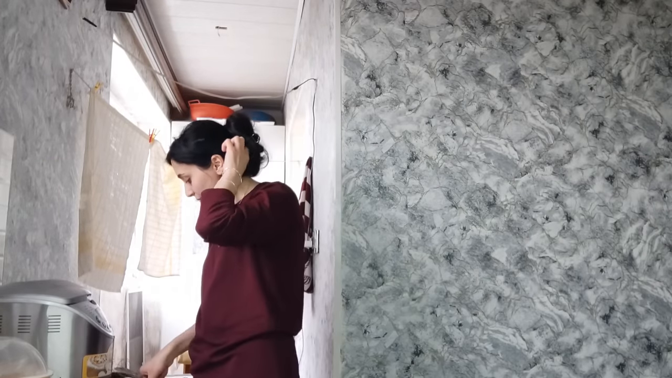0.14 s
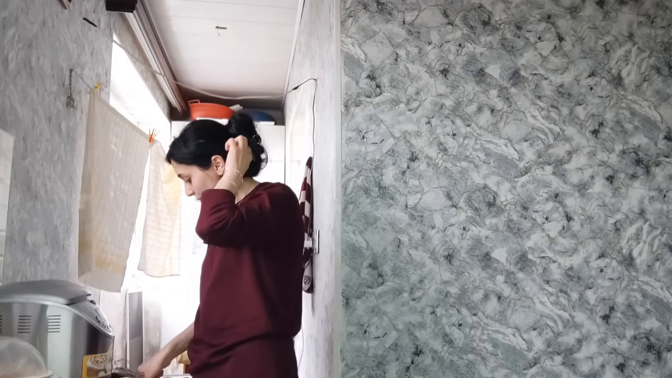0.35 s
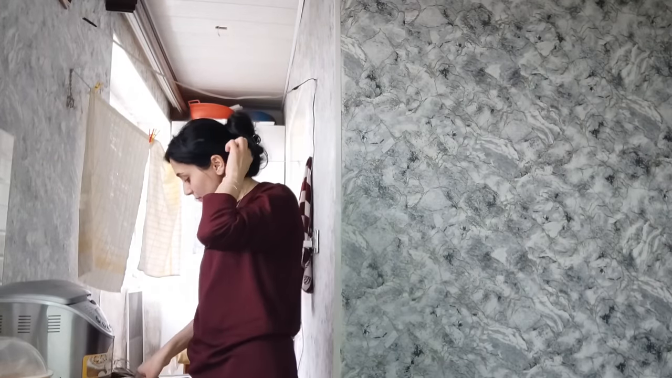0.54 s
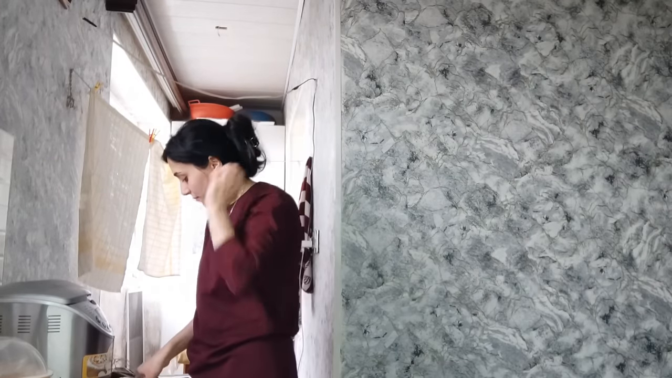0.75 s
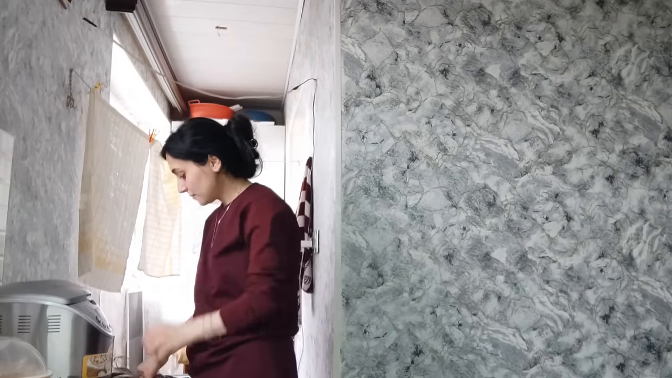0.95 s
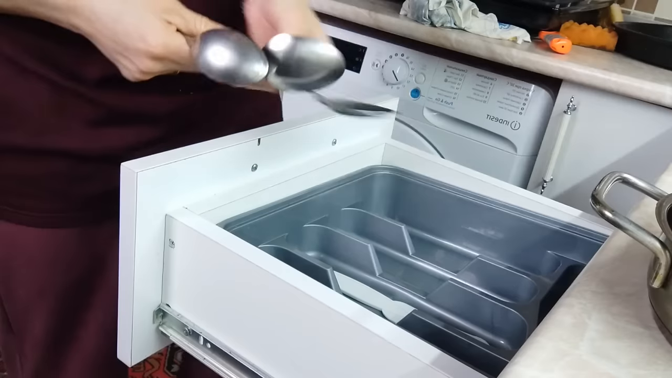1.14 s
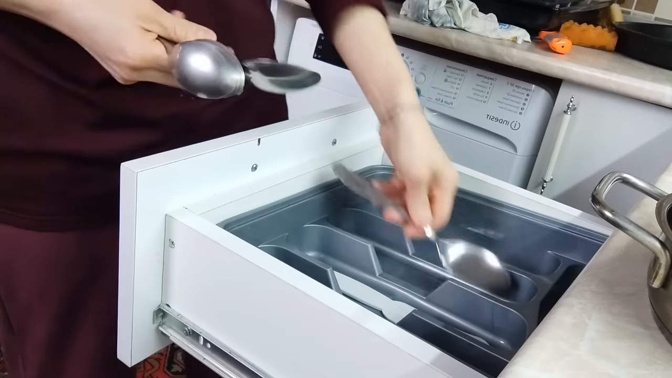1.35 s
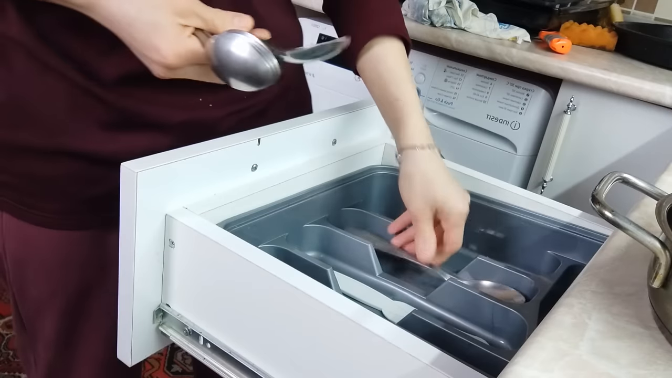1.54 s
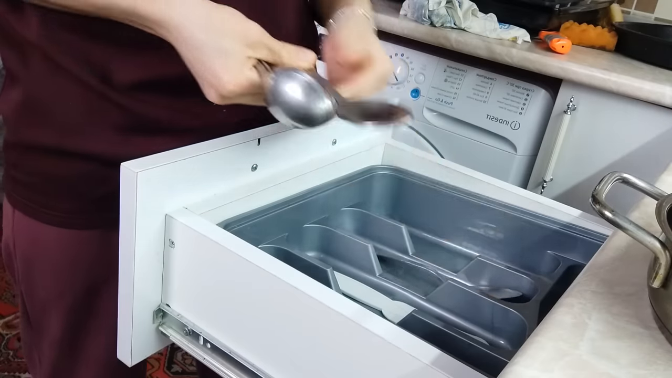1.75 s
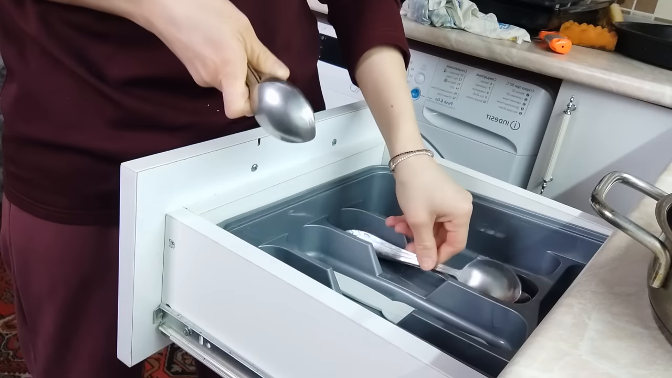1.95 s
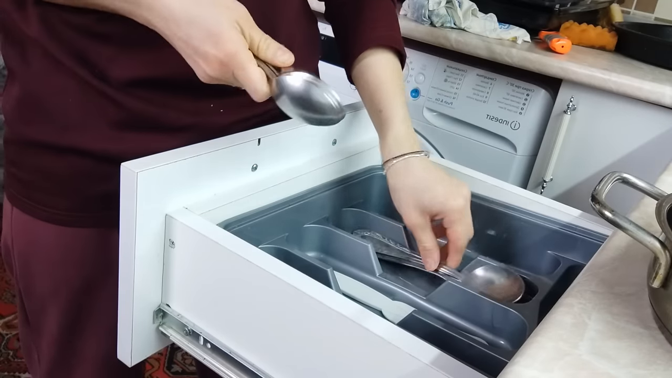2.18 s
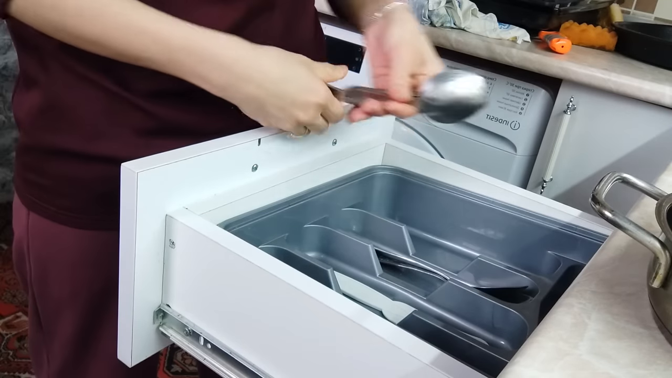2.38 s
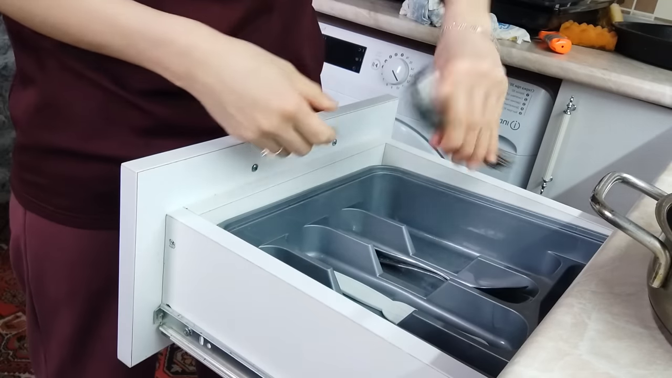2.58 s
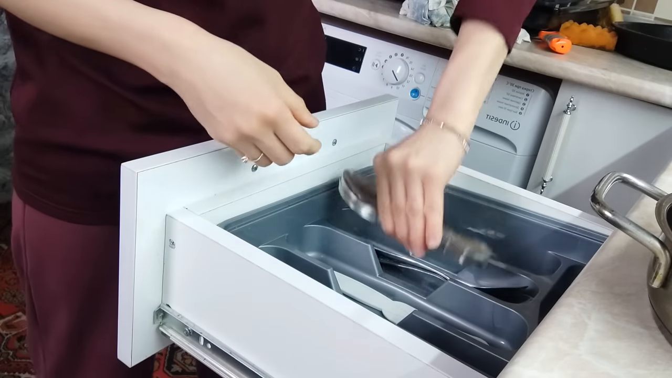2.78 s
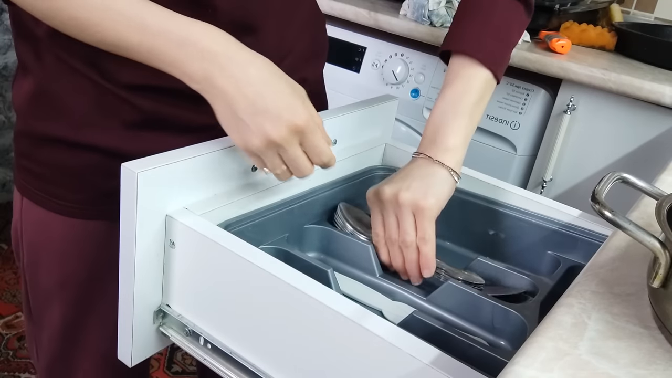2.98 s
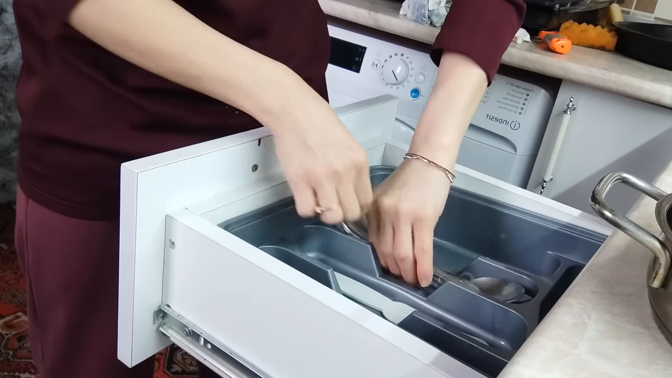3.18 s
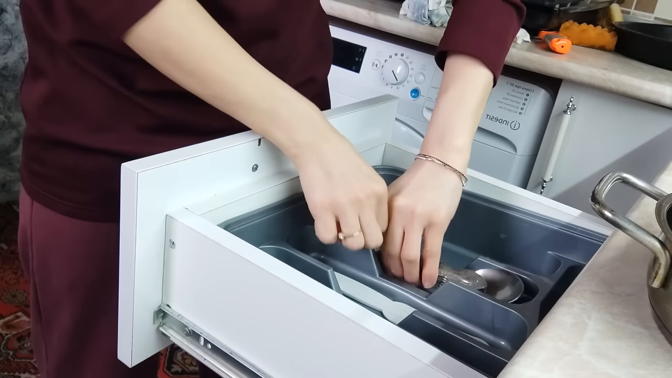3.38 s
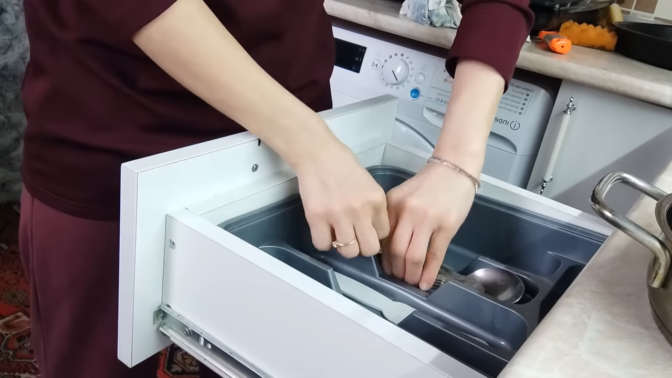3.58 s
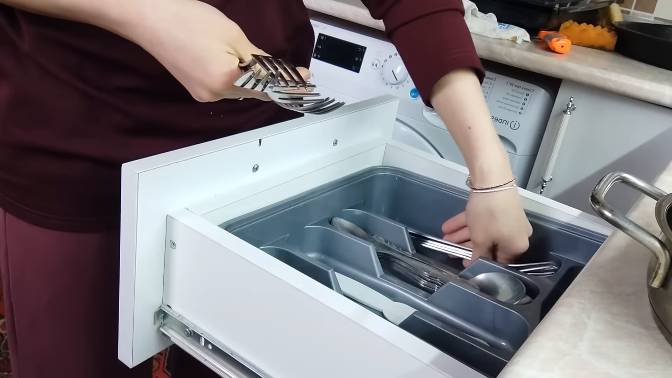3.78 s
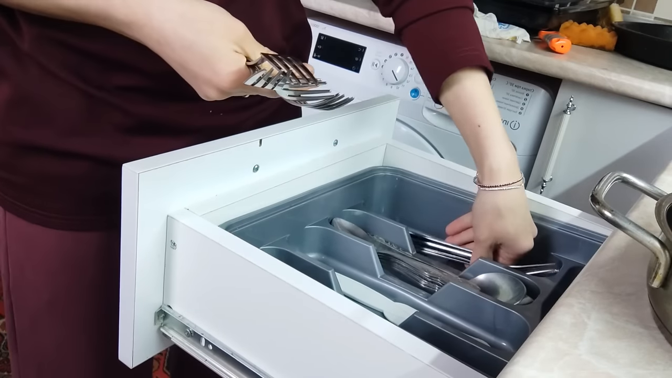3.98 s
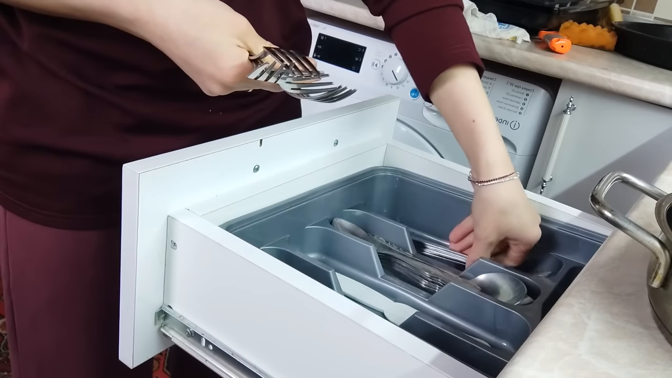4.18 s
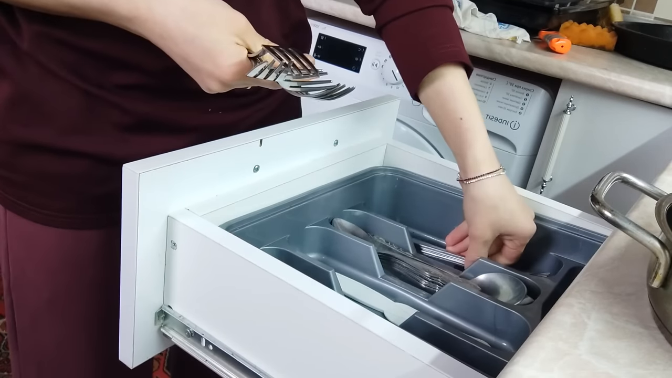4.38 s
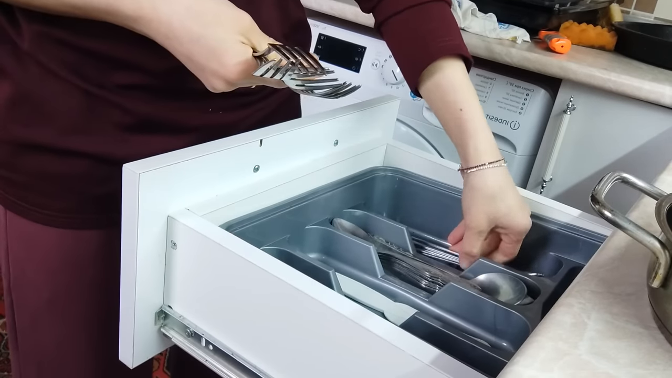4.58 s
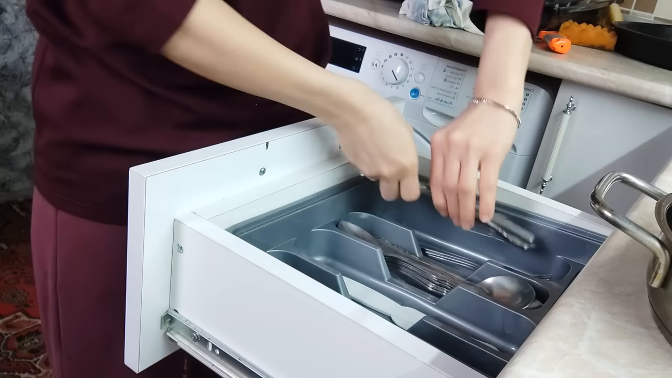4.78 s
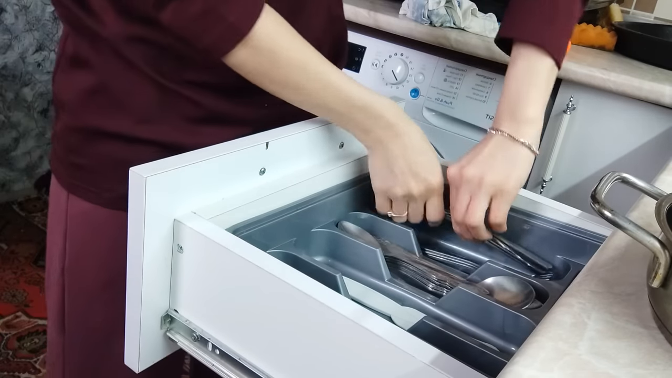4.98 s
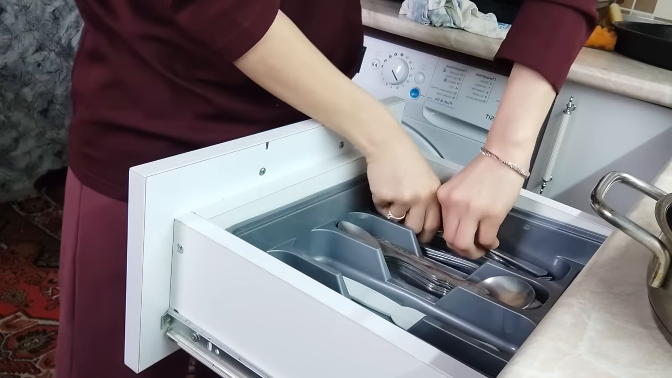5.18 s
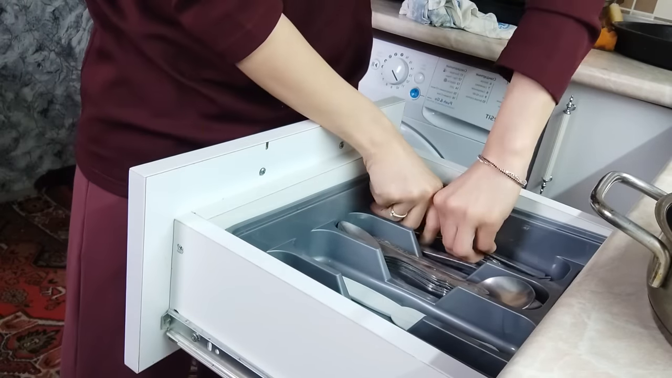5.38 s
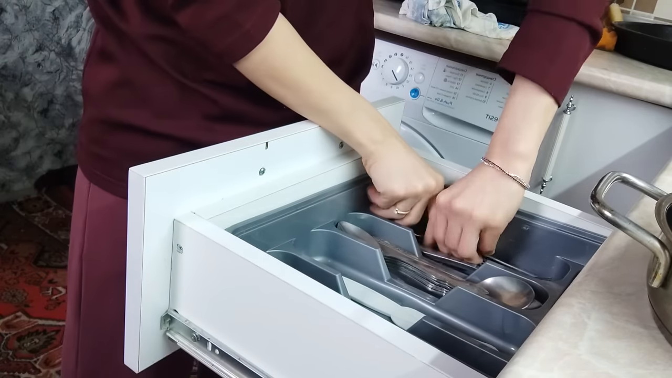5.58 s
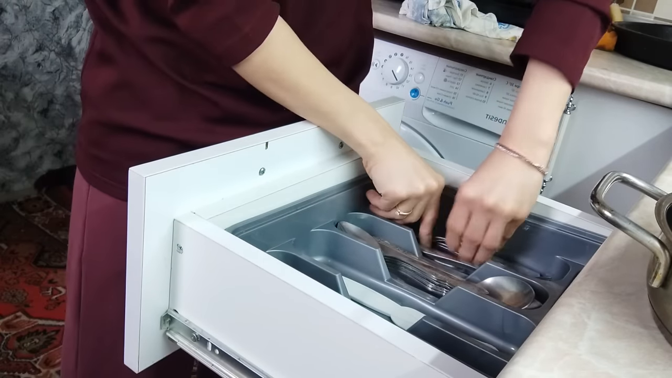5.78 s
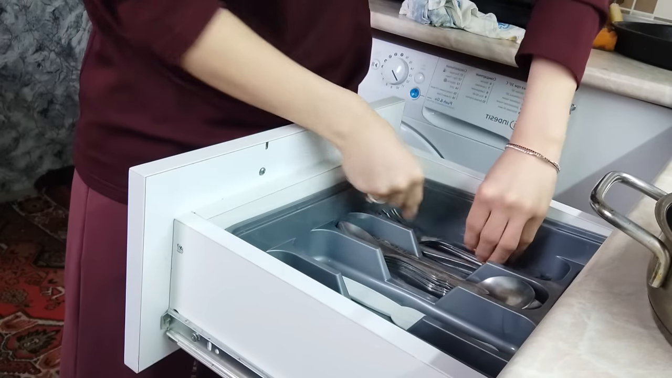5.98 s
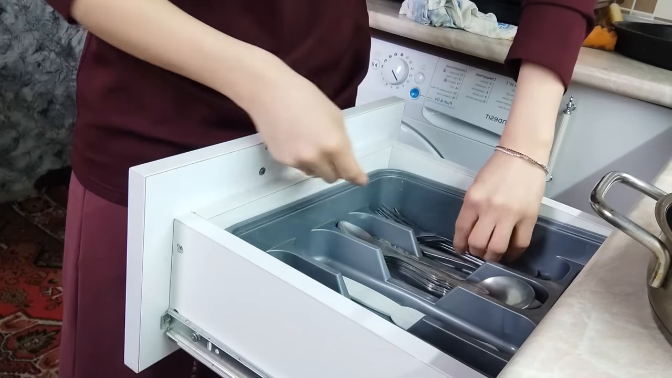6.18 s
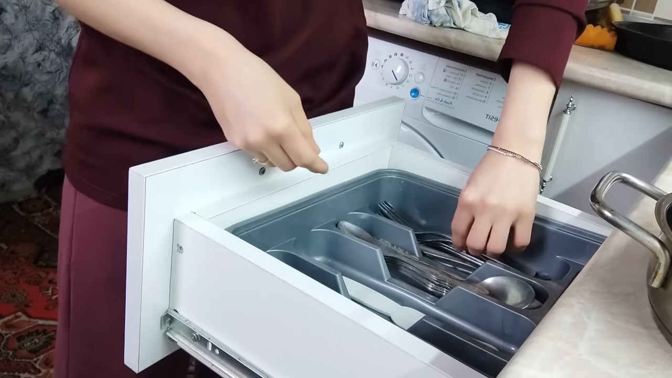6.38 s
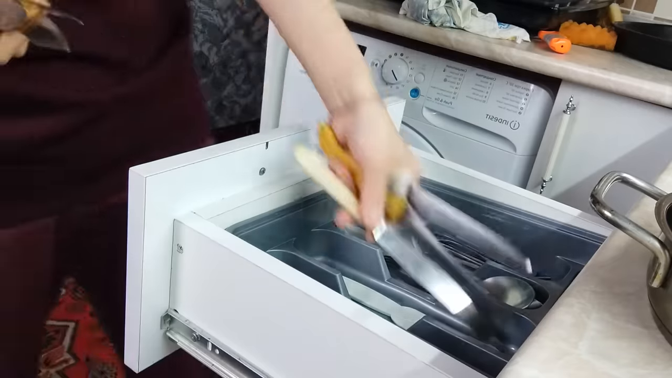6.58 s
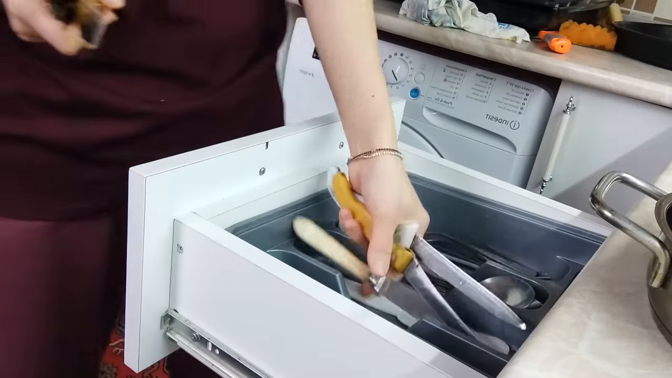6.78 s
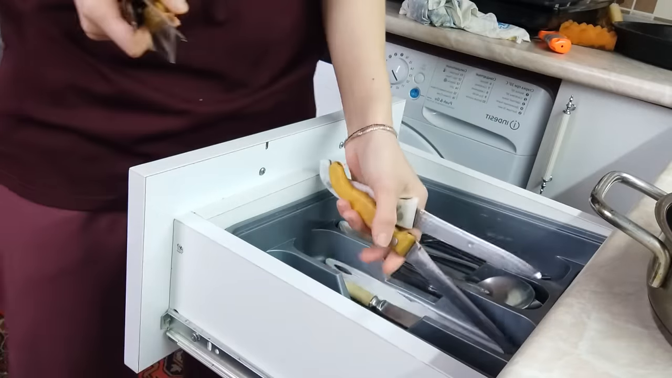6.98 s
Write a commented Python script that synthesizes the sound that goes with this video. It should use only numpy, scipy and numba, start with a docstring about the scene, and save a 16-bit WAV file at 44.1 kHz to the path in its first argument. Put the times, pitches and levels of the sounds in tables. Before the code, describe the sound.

Close, dry sound of cutlery going into a plastic drawer tray in a small kitchen, over faint low hum and hiss. From 0.2 to 0.7 s, thin bright clinks and jingles, then near quiet. At about 1.5 s a spoon lands with a hard, hollow knock; from 1.7 to 2.2 s comes the densest clatter, with clear ringing notes and drawer thumps. A lull, then bright chattering drops at 3.0 and 3.4 to 3.5 s. Forks clink at 3.9 and 4.2 s; around 4.6 to 4.8 s tines scrape raspily. From 5.0 to 6.4 s, knocks, small jingles, short scrapes and a slight squeal at 5.55 s. Blades scrape near 6.7 s, then heavy knife knocks tumble from 6.8 s to the end. Tiny silent dropouts occur near 1.15, 1.8, 2.4, 3.65, 4.7 and 6.5 s.

```python
"""Steel spoons, forks and knives are laid into the plastic tray of a kitchen drawer, heard close up.
Steel chatters on steel and excites clusters of high, quickly damped modes; single notes sing out.
Blows ring the lower modes of tray and drawer; tines and blades scrape as noise through gliding resonances.
Rubbing noise rings the tray over a background hum and hiss; the sound drops out for an instant six times."""
import sys
import numpy as np
from numba import njit
from scipy import signal
from scipy.io import wavfile
from scipy.ndimage import uniform_filter1d

SR = 44100
rng = np.random.default_rng(int(sys.argv[2]) if len(sys.argv) > 2 else 0)


def materialize(psi):
    """Save the field psi as 16-bit PCM at rate SR to the path in sys.argv[1].

    A 1-D psi becomes a single channel; in a 2-D psi each row is a channel.
    """
    bounded = np.clip(np.atleast_2d(psi).T, -1, 1)
    quanta = np.round(bounded * 32767).astype(np.int16)
    wavfile.write(sys.argv[1], SR, quanta)


N = 310464
T = np.arange(N) / SR

# modes of tray and drawer: pitch_hz, relative_db, share of the blow's t60 (used by blows only)
TRAY_MODES = [(70.4, -16, 1.4), (126.4, -3.5, 1.1), (246.4, -7.5, 1.9), (318.5, -0.5, 1.28),
              (357.3, 2.5, 0.64), (402.7, -11.5, 2.6), (486, -2, 0.72), (556, -4, 0.93), (733, -1.5, 0.16),
              (871.7, 3, 0.74), (959, 4.5, 0.27), (1154, -7.5, 0.73), (1290, 3, 0.55), (1585, -0.5, 0.54),
              (1707, 1.5, 0.52), (1914, 2, 0.3), (2350, 1.5, 0.21), (3510, -4, 0.39)]
# short silent gaps: start_s, end_s
GAPS_S = [(1.1452, 1.1676), (1.8125, 1.8345), (2.362, 2.384), (3.638, 3.660), (4.723, 4.7455),
          (6.478, 6.5005)]


def undb(db):
    """Decibels to amplitude ratio: 20 dB is a factor of ten."""
    return 10 ** (np.asarray(db) / 20)


def level(x, db):
    """Root-mean-square scaling: the whole signal is brought to an rms of db."""
    return x * undb(db) / np.sqrt(np.mean(x ** 2))


def loudest_rms(x):
    """Short-time power: the rms of the loudest 10 ms."""
    return np.sqrt(uniform_filter1d(x ** 2, SR // 100).max())


@njit
def band(x, hz, width):
    """Resonant filtering: a state-variable band-pass whose centre moves every sample."""
    y, band_state, low_state = np.empty(len(x)), 0., 0.
    for i in range(len(x)):
        g, k = np.tan(np.pi * hz[i] / SR), width / hz[i]
        v = (band_state + g * (x[i] - low_state)) / (1 + g * (g + k))
        band_state, low_state, y[i] = 2 * v - band_state, low_state + 2 * g * v, k * v
    return y


@njit(fastmath=True)
def modes(x, pole, gain):
    """Modal superposition: exponentially decaying sinusoids, all struck by x."""
    y, re, im = np.zeros(len(x)), np.zeros(len(gain)), np.zeros(len(gain))
    c, s = pole.real.copy(), pole.imag.copy()
    for i in range(len(x)):
        for m in range(len(gain)):
            re[m], im[m] = re[m] * c[m] - im[m] * s[m] + x[i], re[m] * s[m] + im[m] * c[m]
            y[i] += gain[m] * im[m]
    return y


def ring(x, hz, db, t60):
    """Modal resonance: modes of random sign; peaks come near 1, twice the rms of the loudest 10 ms."""
    decay = np.log(1000) / np.clip(t60, .008, 1)
    pole = np.exp((2j * np.pi * hz - decay) / SR)
    gain = undb(db) * np.sign(rng.standard_normal(len(hz)))
    y = modes(x + 1e-18, pole, gain)
    return .5 * y / loudest_rms(y)


def walk(rate, count=N):
    """Slow random modulation: levels held 1 / rate s, then slewed; spread near 1."""
    hold = int(SR / rate)
    held = np.repeat(rng.standard_normal(count // hold + 1), hold)
    return 1.2 * uniform_filter1d(held, hold)[:count]


def contacts(length_s, per_s, first, spread_db, settle_s, settle_db):
    """Repeated impact: a first blow, small contacts thinning over length_s, and trembling of t60 settle_s."""
    swell_s, uneven_db = 0.0026, 3
    grain_db = 7.5  # the trembling is a spray of tiny ticks of uneven size
    stop_power = 1.22  # above 1 the trembling holds at first, then a hand stills it
    t = np.arange(int(.28 * SR)) / SR
    chance = rng.random(len(t))
    size, fine = rng.standard_normal((2, len(t)))

    hits = (chance < per_s / SR) * np.sign(size) * undb(spread_db * abs(size))
    train = hits * np.exp(-(t / max(length_s, .001)) ** 2)

    ticks = fine * undb(grain_db * abs(size))
    strength = undb(settle_db + uneven_db * walk(147.6, count=len(t)))
    settling = np.exp(-np.log(1000) * (t / max(settle_s, .01)) ** stop_power)
    train += strength * ticks * settling

    train *= 1 - np.exp(-t / swell_s)  # the pieces take a moment to start rattling
    train[0] = first
    return train[:int((.045 + settle_s) * SR)]


def add(out, s, sound):
    """Linear superposition: a sound joins the mix at s, dies away softly and ends by the next gap."""
    i = int(s * SR)
    sound = sound * np.minimum(np.arange(len(sound))[::-1] / (.02 * SR), 1)
    end = min([N] + [int(gap_end * SR) for _, gap_end in GAPS_S if gap_end - .004 > s])
    out[i:min(end, i + len(sound))] += sound[:end - i]


def background():
    """Band-filtered noise: steady hum and hiss in half-octave steps; above 2.5 kHz levels waver at random."""
    # background spectrum: pitch_hz, relative_density_db (per Hz)
    spectrum = [(12, -39), (20, 6.5), (68, -8.5), (123, 13.5), (262, -13), (328, -15), (446, 2.5),
                (499, 1.5), (1290, -28.5), (2600, -21), (3070, -16.5), (5530, -27), (7110, -28.5),
                (10800, -20), (16000, -20)]
    waver_db, total_db = 5.4, -47.5
    hz, db = np.transpose(spectrum)
    out = 0
    for f in 25 * 2 ** np.arange(0, 9.4, .5):
        centre = np.full(N, f)
        noise = band(band(rng.standard_normal(N), centre, 0.83 * f), centre, 0.83 * f)
        band_db = np.interp(np.log(f), np.log(hz), db) + (f > 2500) * waver_db * walk(9)
        out = out + undb(band_db) * noise
    return level(out, total_db)


def shuffle():
    """Friction noise: hands and pieces shifting in the tray ring its modes with uneven grit."""
    # rubbing levels, joined by straight lines: time_s, lower_modes_db, upper_modes_db
    rubbing = [(0.0, -51, -53), (0.391, -54.5, -50), (0.88, -58.5, -56.5), (1.508, -59, -58),
               (1.66, -48, -56), (2.08, -40, -44), (2.41, -51.5, -56), (2.86, -59, -54.5),
               (3.31, -52, -53.5), (3.59, -50.5, -54.5), (5.0, -51.5, -53), (5.23, -54, -44.5),
               (5.59, -55, -56), (5.941, -46, -50.5), (6.47, -45, -52.5), (6.76, -54, -47.5),
               (6.92, -44, -35), (7.04, -30.5, -39)]
    grit = rng.standard_normal(N) * undb(3.26 * walk(70))
    s, *levels_db = np.transpose(rubbing)
    out = 0
    for part, part_db in zip([TRAY_MODES[2:9], TRAY_MODES[9:17]], levels_db):
        hz, db, _ = np.transpose(part)
        rubbed = level(ring(grit, hz, db, 14 / hz), 0)  # higher modes die sooner
        out = out + rubbed * undb(np.interp(T, s, part_db))
    return out


def steel():
    """Modal impact: each clink shakes several like pieces, each mode a cluster new in pitch and strength."""
    # steel on steel: start_s, peak_db of the top rings, low_db and mid_db against it,
    # rattle_s (scales chatter, settling and ringing)
    clinks = [(0.172, -23, -10.5, -4, 0.061), (0.179, -19.5, -6.5, -10, 0.22), (0.298, -27.5, -5, -7, 0.11),
              (0.3074, -19.5, -7.5, -7.5, 0.47), (.341, -31.5, 0.5, -16, 0.27), (0.573, -31, -2, -6, 0.33),
              (0.651, -30, -8.5, -14, 0.2), (0.966, -42.5, -1.5, -5, 0.28), (1.164, -28, -2, -14, 0.052),
              (1.2815, -37, -1, -8, 0.079), (1.47, -18.5, -2.5, -2.5, 0.13), (1.522, -46.5, 8.5, 1, 0.4),
              (1.6703, -27, 1, -5, 0.059), (1.708, -24.5, 3.5, -7, 0.1), (1.792, -30.5, 6, -7, 0.019),
              (1.81, -32, 8, 1, 0.046), (1.844, -42, 0, -3, 0.41), (1.865, -18, -3.5, -1.5, 0.23),
              (1.901, -28, -1.5, -7, 0.16), (1.925, -28.5, 1.5, -6, 0.21), (2.036, -38, 5, -8, 0.58),
              (2.1223, -14, -9, -11.5, 0.24), (2.155, -22.5, -3.5, -0.5, 0.16),
              (2.174, -19, -3.5, -5.5, 0.11), (2.21, -33.5, 6, -3, 0.34), (2.327, -29.5, -2, -12, 0.099),
              (2.345, -39, 6.5, -10, 0.098), (2.489, -39, 0, -5, 0.12), (2.539, -35, -1, -5, 0.1),
              (2.979, -20, -4.5, -8, 0.13), (3.024, -18, -9.5, -7, 0.17), (3.045, -28, 1.5, -2, 0.17),
              (3.172, -31.5, -2.5, -9, 0.27), (3.213, -27.5, -1.5, -3.5, 0.16),
              (3.397, -17.5, -9, -7.5, 0.34), (3.427, -17.5, -3.5, -6.5, 0.16), (3.465, -31, -4, -11, 0.3),
              (3.5, -23.5, -4, -1, 0.15), (3.514, -24.5, -4.5, -9.5, 0.17),
              (3.8731, -18, -12.5, -17, 0.087), (3.987, -28, -8.5, -9, 0.088),
              (4.1934, -23.5, -4.5, -13, 0.24), (4.233, -21, -20, -10.5, 0.16), (4.634, -41, 3, -5, 0.25),
              (4.829, -25, -16, -9.5, 0.079), (4.986, -41, 9.5, 3, 0.05), (5.14, -36.5, 9, -3, 0.38),
              (5.39, -27.5, -7, -8, 0.11), (5.508, -40, -3, -2, 0.63), (5.683, -21, -10, -10, 0.14),
              (5.756, -43, 0, -6, 0.099), (5.829, -38.5, -5, -7, 0.047), (5.857, -49, 1, -1, 0.079),
              (5.931, -32, -14, -8, 0.22), (5.959, -21.5, -13.5, -9.5, 0.23), (6.012, -34, 1.5, -18, 0.12),
              (6.05, -37.5, -7, -2.5, 0.33), (6.157, -35.5, -2, -1.5, 0.17), (6.213, -43, -12, -3, 0.095),
              (6.368, -22.5, -11.5, -7, 0.18), (6.501, -34.5, -3, -7, 0.17), (6.735, -44.5, 11, 2, 0.4),
              (6.7603, -36, 12, -4, 0.18), (6.838, -28, -1.5, -9, 0.17), (6.878, -32.5, 5.5, -9, 0.14),
              (6.926, -28.5, 6, -9, 0.088), (6.972, -33.5, 4, -2, 0.22), (7.002, -29.5, 3.5, -3, 0.2)]
    # a typical piece of cutlery: pitch_hz, relative_db
    piece = [(2100, -33), (2700, -27), (3074, -20), (3550, -17), (4030, -18.5), (4384, -34), (4850, -18.5),
             (5320, -20), (5800, -32), (6400, -16.5), (6900, -23.5), (7670, -2), (8140, 10), (8600, 1),
             (8950, -31), (9300, 6.5), (9850, -0.5), (10400, 6), (11350, 0.5), (11500, -11), (11800, -0.5),
             (12150, -10), (12600, -4.5), (13100, 0), (13600, 5.5), (14300, 4.5), (14650, -24),
             (15050, 5.5), (15690, -21)]
    held_t60_s = 0.049  # fingers and neighbours damp every ring: no mode lasts longer
    chatter_share = 0.13  # spread of the chatter against rattle_s
    tick_low_hz, tick_top_hz = 1460, 7850  # the dry click of each contact
    tick_db = -11  # loudest 10 ms rms of the click, against the lower rings' peak
    tick_band = signal.butter(2, [tick_low_hz, tick_top_hz], "band", fs=SR, output="sos")

    out, (hz, db) = np.zeros(N), np.repeat(piece, 5, axis=0).T
    group = np.searchsorted([7000, 11000], hz)
    low = group == 0
    for s, peak_db, low_db, mid_db, rattle_s in clinks:
        shift, strength, life = rng.standard_normal((3, len(hz)))
        f = hz * (1 + np.where(low, .05, .022) * shift)
        g = db + np.where(low, 5, 8) * np.minimum(strength, 1.2)
        free_t60 = np.where(low, .16, .33) * rattle_s * undb(3.0 * np.clip(life, -2, 1))
        t60 = np.minimum(free_t60, held_t60_s)

        touch = contacts(chatter_share * rattle_s, 700, 5.14, 5.04, 1.16 * rattle_s, -18.5)
        tick = signal.sosfilt(tick_band, touch)
        add(out, s, tick / loudest_rms(tick) * undb(peak_db + low_db + tick_db))
        for k, part_db in enumerate([low_db, mid_db, 0]):
            m = group == k
            add(out, s, ring(touch, f[m], g[m], t60[m]) * undb(peak_db + part_db))
    return out


def pings():
    """Beating of close modes: a blow and a few after-touches ring a pair as one clear note."""
    # notes that sing out of a clink: start_s, pitch_hz, peak_db
    notes = [(.172, 5109, -30), (.172, 14163, -21), (.308, 14707, -27), (.345, 3553, -28),
             (.345, 4382, -33), (.345, 15036, -23), (1.472, 1567, -27), (1.868, 5782, -21),
             (1.869, 3074, -26), (1.927, 3898, -15.5), (1.926, 4727, -20), (1.95, 3122, -25.5),
             (2.123, 3068, -19.5), (2.125, 11456, -17), (2.126, 13706, -27), (2.165, 9841, -18),
             (2.98, 4075, -25), (3.029, 11719, -31), (3.05, 14653, -20), (3.176, 1567, -34),
             (3.24, 6277, -37), (3.401, 8129, -29), (3.43, 1976, -19.5), (3.464, 3117, -25),
             (3.502, 15687, -21), (3.505, 12339, -28), (3.876, 1480, -27), (4.232, 14083, -25),
             (6.37, 13421, -24), (7.005, 5179, -25)]
    ping_t60_s, pair_spread = 0.054, 0.0046  # spread: typical detuning of the second mode, share of pitch
    out = np.zeros(N)
    for s, hz, db in notes:
        touch = contacts(0.022, 300, 4.6, 2.6, ping_t60_s, -19)
        pair = hz * (1 + pair_spread * np.array([0, rng.standard_normal()]))
        add(out, s, ring(touch, pair, np.array([0, -5]), ping_t60_s) * undb(db))
    return out


def tray():
    """Contact-time filtering: blows ring the tray and drawer, longer pushes weakening the higher modes."""
    # steel on the tray: start_s, peak_db of the lower modes, mid_db and high_db against it, blow_t60_s
    knocks = [(.174, -41, 2, 3.5, 0.12), (.298, -34.5, -1, -1, 0.083), (.308, -33.5, -8, 2, 0.14),
              (.35, -39, -5, -3, 0.21), (.578, -48.5, -4, 8, 0.24), (0.653, -41, -2, -6, 0.12),
              (1.172, -39.5, -2, -6, 0.037), (1.476, -6.5, -9, -9, 0.036), (1.518, -23, -1, 0, 0.085),
              (1.544, -25.5, -20, -17, 0.097), (1.599, -30.5, -6, 4, 0.022), (1.709, -7.5, -9, -7.5, 0.046),
              (1.74, -21, 0.5, -6, 0.054), (1.792, -10, -6, -3.5, 0.019), (1.81, -17.5, 0, -9, 0.037),
              (1.865, -31.5, -1, -5, 0.25), (1.925, -5.5, -14, 0.5, 0.027),
              (1.932, -14.5, -0.5, -2.5, 0.066), (2.123, -16, -9, -2, 0.058),
              (2.155, -18.5, -0.5, -0.5, 0.14), (2.19, -24.5, 1, 6, 0.031), (2.385, -49.5, 5.5, 1, 0.17),
              (2.98, -12.5, -11, -10, 0.068), (3.028, -24.5, 2, 1.5, 0.095), (3.15, -34, -7, 4, 0.081),
              (3.21, -30, 3.5, 2.5, 0.11), (3.382, -14, -23, -18, 0.014), (3.417, -28.5, 2.5, 4.5, 0.2),
              (3.519, -20, -9.5, -5.5, 0.056), (3.872, -27.5, 0.5, 6.5, 0.043), (3.958, -41, 0, 2, 0.15),
              (3.986, -37.5, -3, 14, 0.052), (4.194, -20, 3, -1.5, 0.086), (4.229, -32, 4, 2.5, 0.11),
              (4.747, -43, 0, 3, 0.014), (4.987, -19, 6.5, 6.5, 0.03), (4.994, -27, 2, 7, 0.027),
              (5.093, -24, -30, -27, 0.025), (5.17, -23.5, -25, -27, 0.15),
              (5.1961, -17.5, -2, -28.5, 0.059), (5.242, -24.5, -4, -9.5, 0.025),
              (5.331, -29, -2.5, -8, 0.24), (5.383, -22.5, -3, -10, 0.075), (5.427, -36.5, 9, 9, 0.027),
              (5.571, -26, -9, -30, 0.12), (5.682, -18, 6.5, -2.5, 0.053), (5.754, -20.5, -4.5, -12, 0.025),
              (5.8, -49, -6, -16, .06), (5.829, -37, 12, -11, 0.017), (5.855, -28, -3, -13, 0.023),
              (5.933, -39, 13, -26, 0.029), (5.958, -33, 9.5, -0.5, 0.11), (6.013, -16, -9, -11.5, 0.031),
              (6.158, -25.5, -1.5, -5.5, 0.063), (6.212, -30.5, -2.5, -16, 0.062),
              (6.373, -21, -7, -12, 0.073), (6.427, -35.5, 5, 3.5, 0.069), (6.764, -14, -2, -11, 0.053),
              (6.777, -21, -9, -14, 0.067), (6.8, -21.5, -21, -23, 0.067), (6.821, -3.5, -9.5, -16, 0.023),
              (6.826, -13.5, -3.5, -9, 0.021), (6.84, -34, -11, 8, 0.041), (6.868, -17.5, -6.5, -6, 0.043),
              (6.88, -14, -15, -12, 0.044), (6.924, -18, 0.5, -2, 0.058), (6.948, -19, -33, -15, 0.064),
              (7.004, -19, -7, -3.5, 0.047)]
    # heavy landings that shake the whole drawer: start_s, peak_db
    thuds = [(0.577, -29), (0.656, -35), (1.516, -23), (1.544, -16.5), (1.789, -23), (1.927, -29.5),
             (2.157, -24), (2.186, -24.5), (3.029, -34), (3.149, -38), (3.382, -30), (4.196, -27.5),
             (4.23, -44), (4.987, -21), (6.16, -32.5), (6.373, -28.5), (6.43, -34), (6.841, -29),
             (6.873, -28), (6.949, -22.5), (7.004, -22)]
    # contact times: push_s for the drawer, lower, middle and upper modes
    push_s = [0.0047, 0.0011, 0.00064, 0.00022]
    tumble_s, thud_t60_s = 0.0085, 0.094  # each mode rings for its share of the blow's t60
    tray_low_hz = 189  # the tray's blows carry no deep boom
    thin = signal.butter(2, tray_low_hz, "high", fs=SR, output="sos")

    out, (hz, db, share) = np.zeros(N), np.repeat(TRAY_MODES, 5, axis=0).T
    group = np.searchsorted([150, 500, 1200], hz)  # 0 is the drawer
    blows = []
    for s, peak_db, mid_db, high_db, t60 in knocks:
        blows.append((s, t60, {1: peak_db, 2: peak_db + mid_db, 3: peak_db + high_db}))
    for s, peak_db in thuds:
        blows.append((s, thud_t60_s, {0: peak_db}))

    for s, t60, parts in blows:
        shift, strength = rng.standard_normal((2, len(hz)))
        f = hz * (1 + np.where(group > 1, .08, .022) * shift)
        g = db + 3.05 * strength
        touch = contacts(tumble_s, 600, 2.44, 4.0, 1.59 * t60, -28.5)
        for k, part_db in parts.items():
            m = group == k
            # the thin floor yields, so the low modes feel a longer push
            push = np.convolve(touch, np.hanning(int(SR * push_s[k]) + 3))[:len(touch)]
            sound = ring(push, f[m], g[m], t60 * share[m])
            if k:
                sound = signal.sosfilt(thin, sound)
            add(out, s, undb(part_db) * sound)
    return out


def scrapes():
    """Stick-slip friction: grit excites a gliding resonance; a squeal is narrow and has overtones."""
    # tines and blades sliding: loudest_s, fade_s, first_hz, last_hz, width_hz,
    # level_db (rms ahead of the rise and fade)
    slides = [(3.371, 0.041, 3000, 2400, 500, -42.5), (4.542, 0.055, 2660, 2500, 400, -44),
              (4.59, 0.039, 3840, 3040, 382, -32), (4.625, 0.061, 3120, 2830, 404, -26),
              (4.65, 0.12, 2010, 1800, 490, -38), (4.675, 0.056, 2820, 2530, 350, -26.5),
              (4.69, 0.041, 7700, 8040, 600, -41.5), (4.695, 0.033, 3930, 3580, 493, -27),
              (4.69, 0.054, 5120, 4850, 605, -33), (4.695, .05, 6500, 6500, 700, -46),
              (4.755, 0.027, 3440, 3270, 600, -46), (4.79, 0.072, 2480, 2450, 400, -47),
              (5.015, 0.026, 3870, 3600, 350, -43), (5.055, 0.13, 3110, 3340, 456, -34.5),
              (5.145, 0.11, 2750, 2420, 490, -39), (5.165, 0.064, 5270, 5310, 450, -28.5),
              (5.179, 0.079, 5900, 5800, 450, -34), (5.27, 0.054, 4650, 4700, 400, -40),
              (5.449, 0.06, 2370, 1780, 404, -43.5), (5.536, 0.066, 3280, 3250, 406, -35),
              (5.545, 0.082, 4780, 4800, 400, -46), (6.352, 0.17, 2900, 2900, 490, -51.5),
              (6.427, 0.062, 4150, 3400, 420, -32), (6.44, 0.056, 3250, 2400, 500, -33),
              (6.66, 0.095, 3500, 2900, 450, -41), (6.675, 0.1, 3000, 2300, 450, -34.5),
              (6.675, 0.053, 2400, 1600, 400, -32.5), (6.675, .06, 8200, 8100, 500, -53.5),
              (6.76, 0.061, 5000, 5840, 420, -37)]
    # a tine squeals as it slides: loudest_s, fade_s, first_hz, last_hz, base_db
    squeals = [(4.765, 0.099, 5000, 4990, -41.5), (5.55, 0.061, 4430, 4290, -30)]
    # squeal partials 1, 2 and 3: partial_db added to base_db
    partials_db = [4.5, -17, -12]
    squeal_width_hz = 220  # of the first partial; the others widen in proportion
    rise_s, rise_share = 0.04, 0.65  # longest rise; a short slide sets in faster, in this share of its fade
    # narrow resonances at random pitches near the slide add tonal streaks; level against the bare scrape
    streak_db, streak_t60_s = -3, 0.035
    catches_per_s, catch_db = 530, 12.5  # a sliding tine catches and lets go

    out = np.zeros(N)
    rows = list(slides)
    for s, fade, first, last, db in squeals:
        for k, part_db in enumerate(partials_db, 1):
            rows.append((s, fade, k * first, k * last, k * squeal_width_hz, db + part_db))

    for top, fade_s, first_hz, last_hz, width_hz, db in rows:
        # a slide already under way at a gap is heard from the gap's end on
        rise_start = top - min(rise_s, rise_share * fade_s)
        start = max([rise_start] + [gap_end for _, gap_end in GAPS_S if gap_end < top])
        end = top + fade_s
        t = start + np.arange(int(.3 * SR)) / SR

        noise = rng.standard_normal(len(t))
        uneven_db = 1.7 * walk(231.0, count=len(t))
        catches = rng.random(len(t)) < catches_per_s / SR
        tone = noise * undb(uneven_db + catch_db * catches)
        hz = np.interp(t, [start, end], [first_hz, last_hz])
        for _ in range(3):  # three passes of double width leave about width_hz
            tone = band(tone, hz, 2 * width_hz)
        tone = level(tone, 0)

        reach_hz = width_hz + abs(first_hz - last_hz) / 2
        streak_hz = (first_hz + last_hz) / 2 + reach_hz * np.linspace(-1, 1, 8)
        streak_hz = streak_hz + 60 * rng.standard_normal(8)
        streaks = ring(tone, streak_hz, 0 * streak_hz, streak_t60_s)
        tone = tone + level(streaks, streak_db)
        envelope = np.interp(t, [start, top, end], [0, 1, 0]) ** 0.95
        add(out, start, level(tone, db) * envelope)
    return out


def room(x):
    """Diffuse reverberation: the echo of a small kitchen, duller than the direct sound."""
    room_t60_s, room_db, room_hz = 0.38, -14.5, 5000
    t = np.arange(int(.5 * SR)) / SR
    dull = signal.butter(1, room_hz, fs=SR, output="sos")
    noise = signal.sosfilt(dull, rng.standard_normal(len(t)))
    tail = noise * np.exp(-np.log(1000) * t / room_t60_s) * np.minimum(t / 0.0025, 1)
    tail = tail / np.sqrt(np.sum(tail ** 2))
    return x + undb(room_db) * signal.fftconvolve(x, tail)[:len(x)]


def scene():
    """Superposition of sources: the drawer with its echo, over the background."""
    drawer = shuffle() + steel() + pings() + tray() + scrapes()
    # the drawer's sounds carry no deep bass
    drawer = signal.sosfilt(signal.butter(2, 80, "high", fs=SR, output="sos"), drawer)
    # no echo carries over a gap
    stretches = np.split(drawer, [int(end * SR) for _, end in GAPS_S])
    return (np.concatenate([room(x) for x in stretches]) + background())[None]


def record(dry):
    """Soft saturation and low-pass filtering: loud peaks are rounded, gaps silenced, the top is cut."""
    top_hz = 15950
    on = np.ones(N)
    for start, end in GAPS_S:
        on *= np.clip(np.maximum(start - T, T - end) / .0004, 0, 1)
    rounded = np.tanh(.6 * dry) / .6
    return signal.sosfilt(signal.ellip(10, .2, 80, top_hz, fs=SR, output="sos"), rounded * on)


dry = scene()
out = record(dry)
materialize(out)
```